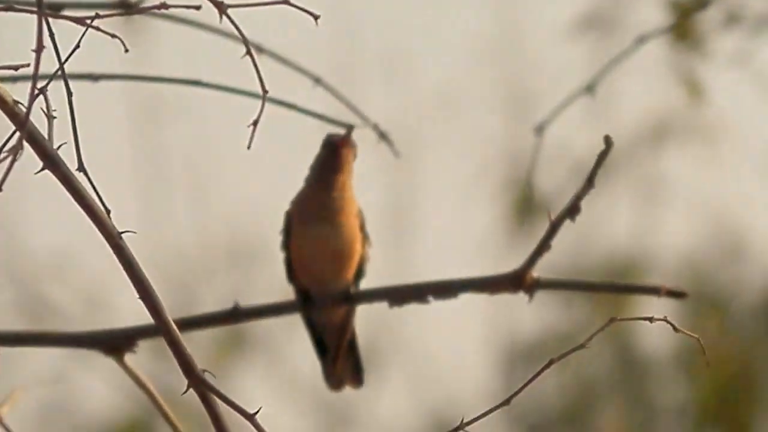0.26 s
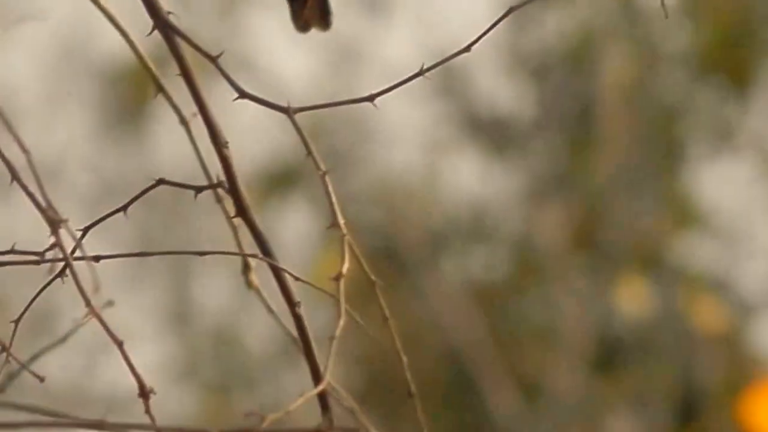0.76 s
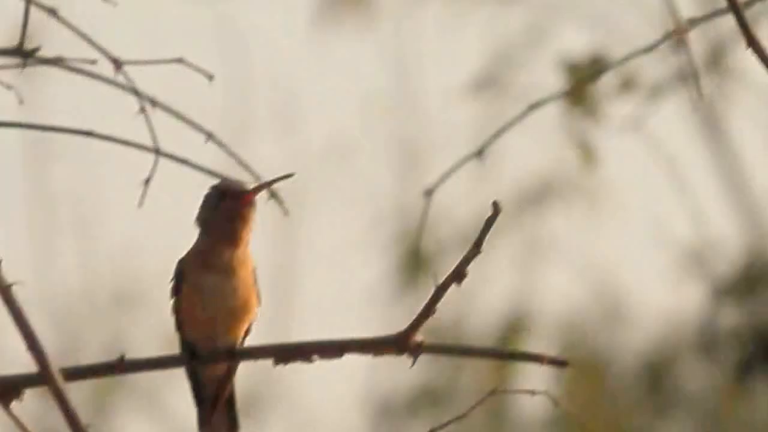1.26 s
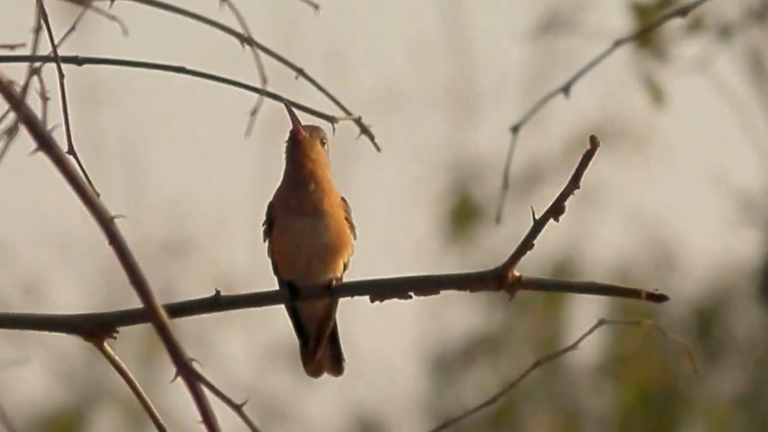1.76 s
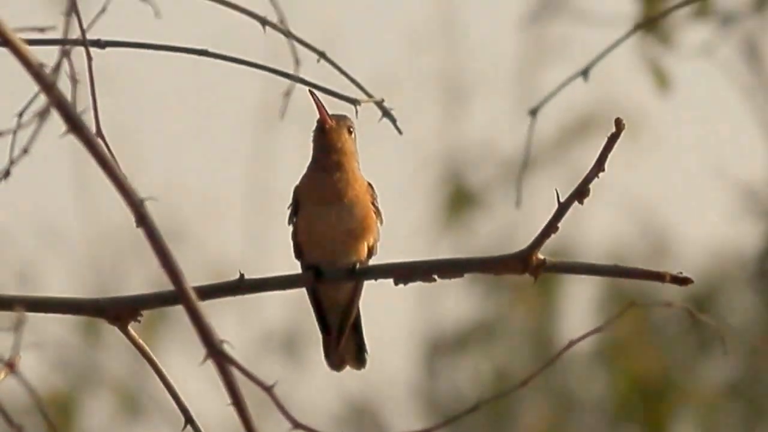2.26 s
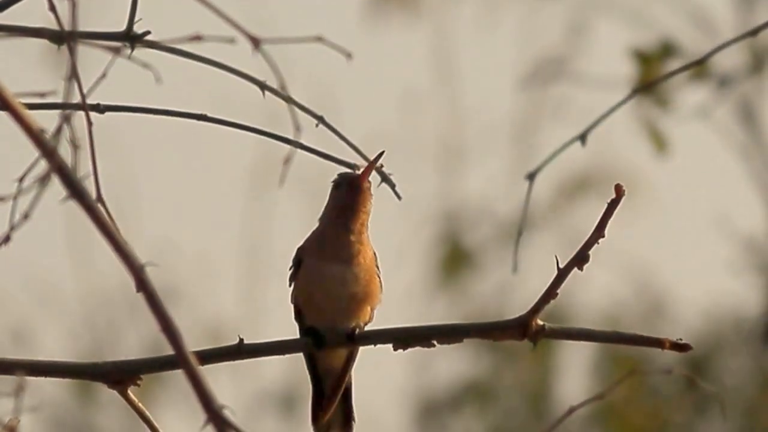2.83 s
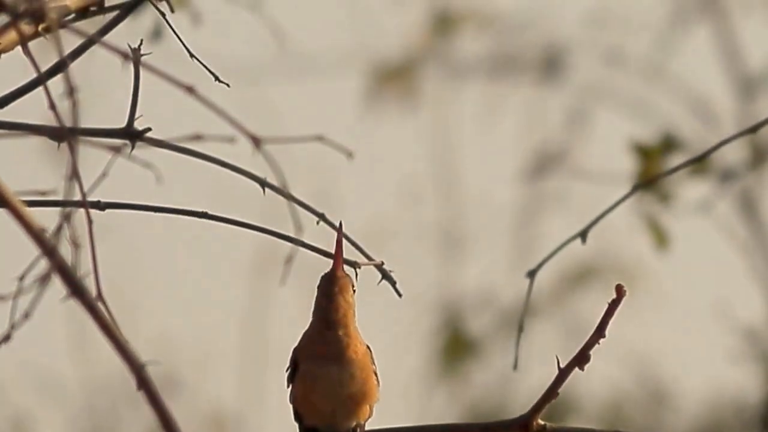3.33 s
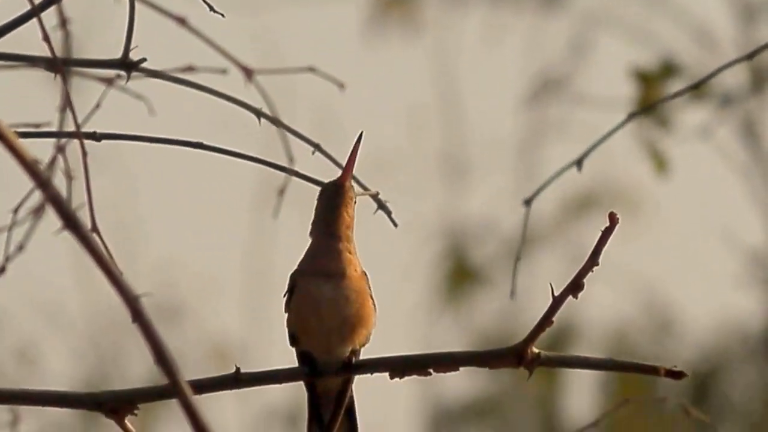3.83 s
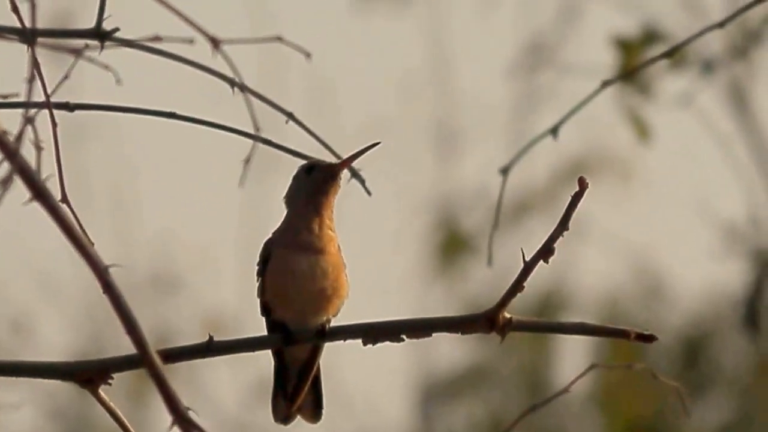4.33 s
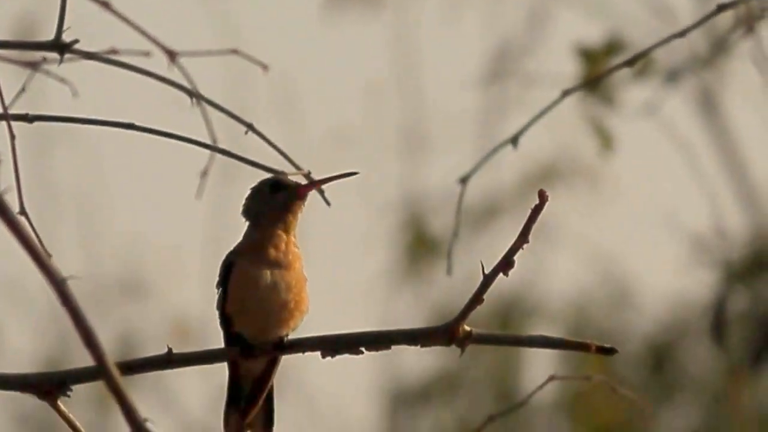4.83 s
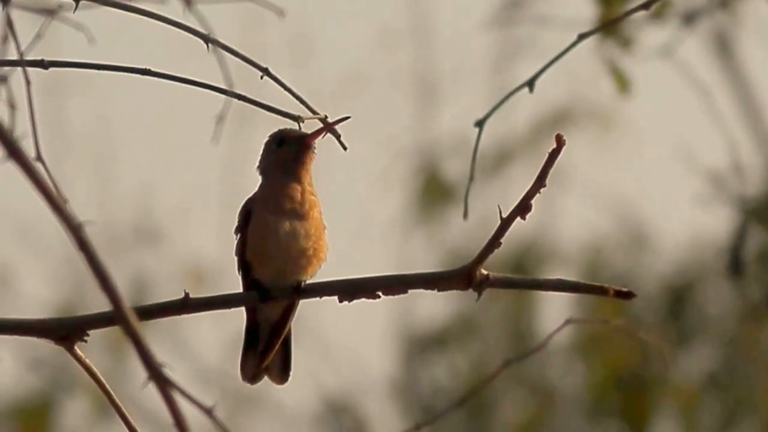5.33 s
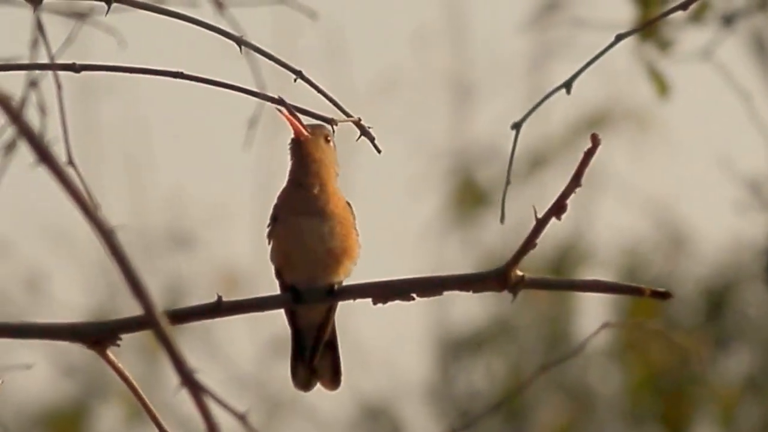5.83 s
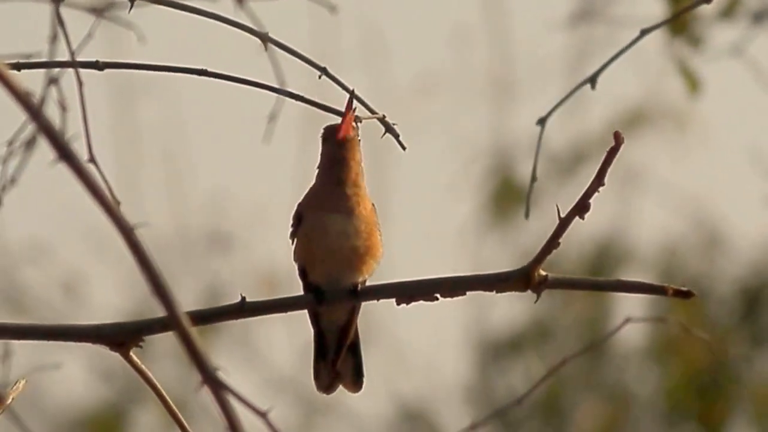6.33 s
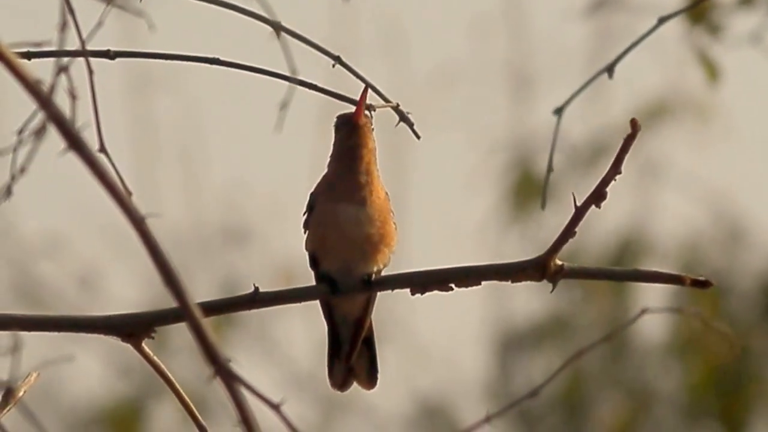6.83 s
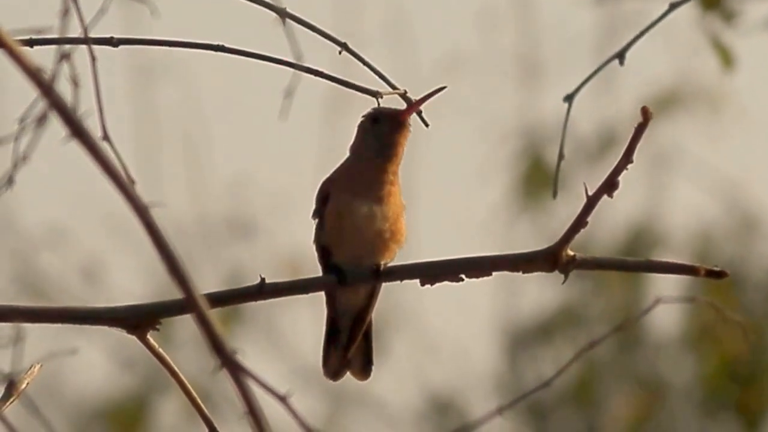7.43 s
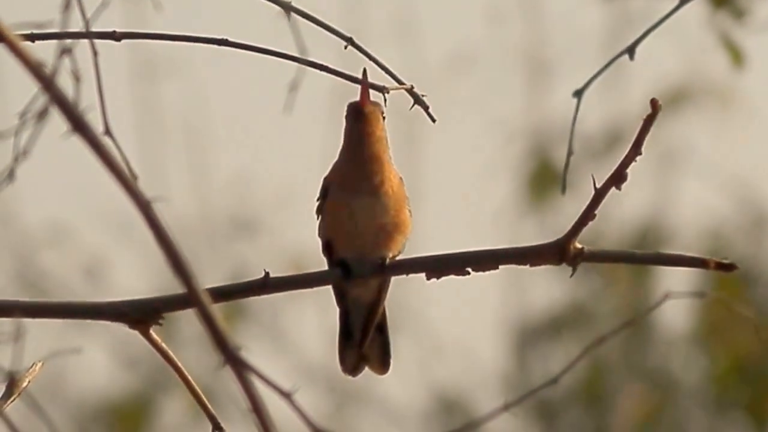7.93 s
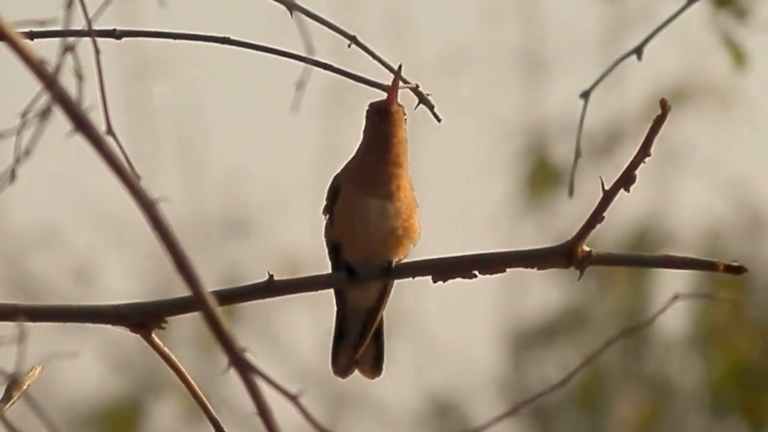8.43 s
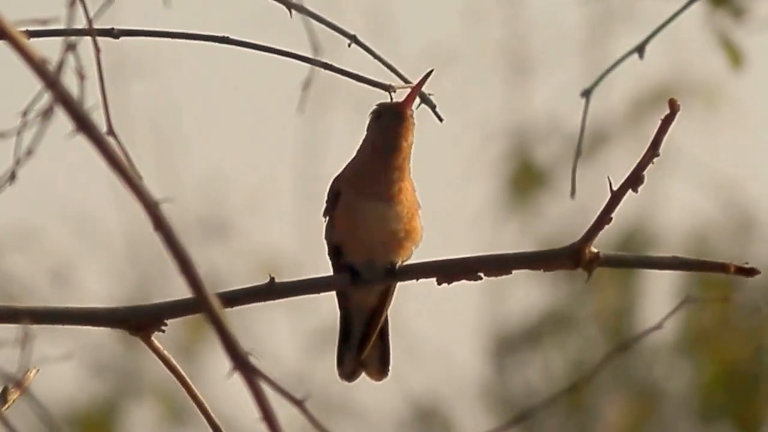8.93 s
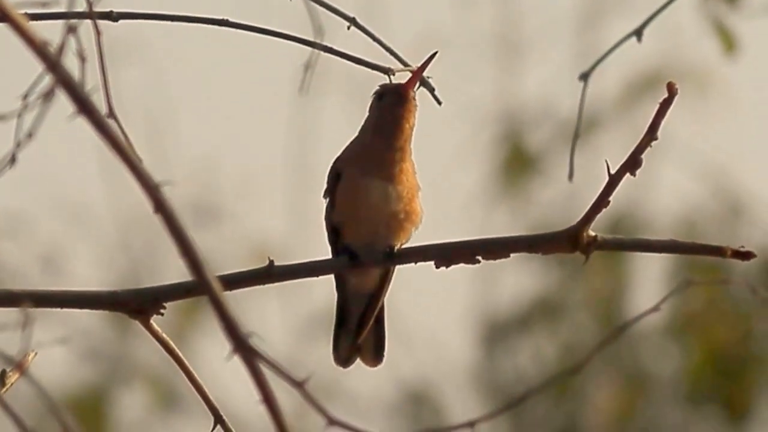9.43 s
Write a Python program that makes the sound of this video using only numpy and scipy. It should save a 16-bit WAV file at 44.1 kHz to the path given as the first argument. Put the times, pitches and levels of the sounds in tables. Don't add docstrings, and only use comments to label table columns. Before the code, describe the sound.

Outdoors in thorny scrub, a hummingbird on a branch gives brief chips, a rough rasp and thin climbing notes, then diving whistles and a run of four hooked notes. Farther birds sweep upward, whistle and warble with blurred echoes. Fine insect shimmer and faint fly hum sit over soft traffic rumble. Fingers tick and knock on the microphone housing, mostly in the first half.

```python
import sys
import numpy as np
from scipy import signal
from scipy.fft import rfft, irfft, next_fast_len
from scipy.io import wavfile
from scipy.ndimage import uniform_filter1d, map_coordinates

SR = 44100
rng = np.random.default_rng(int(sys.argv[2]) if len(sys.argv) > 2 else 0)


def voltage_ratio(level):
    return 10 ** (np.asarray(level, float) / 20)


def put_to_file(sound):
    columns = np.atleast_2d(sound).T
    safe = np.clip(columns, -1, 1)
    whole_steps = np.round(safe * 32767)
    wavfile.write(sys.argv[1], SR, whole_steps.astype(np.int16))


N = 426447


def unit(x):
    return x / np.sqrt(np.mean(x ** 2) + 1e-20)


def along(points, hz):
    f, v = np.transpose(points)
    return np.interp(np.log(hz + 1), np.log(f + 1), v)


def wobble(rate, size=N):
    i = np.arange(0, size + 8, 8)
    knots = rng.standard_normal(int(size * 2000 / SR) + 4)
    return np.interp(np.arange(size), i, map_coordinates(knots, [i * min(rate, 2000) / SR]))


def filtered(x, response):
    m = next_fast_len(N + SR // 2)
    return irfft(rfft(x, m) * response(np.fft.rfftfreq(m, 1 / SR)), m)[:N]


def rush(spectrum, patchy_db):
    z = signal.stft(rng.standard_normal(N), nperseg=512)[2]
    field = uniform_filter1d(uniform_filter1d(rng.standard_normal(z.shape), 5, 0), 12, 1)
    noise = signal.istft(z * voltage_ratio(patchy_db * unit(field)), nperseg=512)[1][:N]
    return unit(filtered(noise, lambda hz: voltage_ratio(along(spectrum, hz))))


def add(track, s, x):
    part = track[round(s * SR):][:len(x)]
    part += x[:len(part)]


def tone(hz):
    return np.sin(2 * np.pi * np.cumsum(hz) / SR)


def traced(rows, smooth):
    s, *cols = np.transpose(rows)
    t = np.arange(s[0], s[-1], 1 / SR)
    size = max(1, int(smooth * SR))
    return [uniform_filter1d(np.interp(t, s, c), size, mode="nearest") for c in cols]


def edges(size, fade):
    i = np.arange(size) / SR / fade
    return np.sin(np.pi / 2 * np.minimum(1, np.minimum(i, i[::-1]))) ** 2


def copies(calls, shape):
    return [[(s + stretch * t, hz * share, db + rel_db) for t, share, rel_db in shape]
            for s, stretch, hz, db in calls]


def scrub(x, t60, gap):
    t = np.arange(SR // 2) / SR
    tail = rng.standard_normal(len(t)) * voltage_ratio(-60 * t / t60) * (t > gap)
    return signal.fftconvolve(x, tail / np.linalg.norm(tail))[:N]


def traffic():
    # time_s, rumble_db, roar_db
    levels = [(0.0, -35.5, -41.5), (2.29, -39, -43), (7.11, -38.5, -42.5), (7.78, -34.5, -43),
              (8.051, -39.5, -42.5), (9.67, -38, -43.5)]
    # pitch_hz, level_db per Hz
    rumble = [(20, -12.5), (45, -9), (75, 4), (100, -5), (135, -0.5), (170, -6), (230, -18.5), (330, -39.5),
              (600, -67)]
    roar = [(120, -40), (220, 2), (350, -3), (520, -4), (660, -3), (900, -5), (1150, -7), (1400, -11.5),
            (2500, -12.5), (3400, -17.5), (4200, -23), (6000, -22.5), (16000, -44)]
    s, rumble_db, roar_db = np.transpose(levels)
    t = np.arange(N) / SR
    low = voltage_ratio(np.interp(t, s, rumble_db) + 3.5) * rush(rumble, patchy_db=-0.5)
    return low + voltage_ratio(np.interp(t, s, roar_db)) * rush(roar, patchy_db=1.08)


def insects():
    # pitch_hz, level_db per Hz
    shimmer = [(5500, -41), (6600, -9.5), (7300, -0.5), (8400, 1), (9000, 5.5), (9700, -3), (11000, -11.5),
               (13000, -15), (15000, -12.5), (15800, -16)]
    # pitch_hz, strokes_per_s, level_db
    singers = [(6982, 40, -70), (7407, 38, -65), (8274, 54, -68), (8646, 54, -67), (8764, 36, -67),
               (8866, 36, -63), (9222, 42, -68), (9494, 49, -69)]
    # time_s, wing_hz
    fly = [(0, 645), (.7, 661), (1.1, 625), (1.8, 656), (2.5, 630), (3.3, 649), (3.7, 672), (4.05, 638),
           (4.25, 689), (4.47, 627), (4.7, 668), (5.3, 645), (6.1, 642), (6.55, 675), (6.95, 645),
           (7.3, 661), (8.2, 640.5), (9.67, 655)]
    # wing_hz, level_db
    wings = [(640, -62), (580, -61), (695, -62), (728, -61)]
    t = np.arange(N) / SR
    out = voltage_ratio(-49.5) * rush(shimmer, patchy_db=0.8)
    for hz, rate, db in singers:
        strokes = np.exp(1.1 * np.cos(2 * np.pi * rate * t + .3 * wobble(4)))
        carrier = np.sin(2 * np.pi * hz * t + 0.4 * wobble(8.9))
        out += voltage_ratio(db + 4.6 * wobble(3.18)) * unit(strokes * carrier)
    fly_hz = np.interp(t, *np.transpose(fly)) * (1 + .008 * wobble(6))
    out += voltage_ratio(-53 + 2.5 * wobble(3)) * tone(fly_hz)
    for hz, db in wings:
        wing_hz = hz * (1 + .015 * wobble(1.2) + .016 * wobble(5))
        out += voltage_ratio(db + 4.5 * wobble(1.6)) * tone(wing_hz)
    return out


def syrinx(hz, db, tilt_db, narrow=1, bigger=1, count=7):
    # pitch_hz, gain_db
    throat = [(1700, -16), (2600, -8), (3500, -10.5), (5000, 9), (6500, 7), (7400, -9.5), (8500, -6),
              (11000, -11.5), (13500, -39), (15500, -45)]
    k = np.arange(1, count + 1)[:, None]
    gain = voltage_ratio(narrow * along(throat, bigger * k * hz) + tilt_db * np.log2(k)) * (k * hz < 16000)
    tones = gain * np.sin(k * 2 * np.pi * np.cumsum(hz) / SR)
    return voltage_ratio(db) * tones.sum(0) / np.sqrt((gain ** 2).sum(0) / 2 + 1e-9)


def chip(db, length, knee_hz, slow):
    rest_hz = 1210
    t = np.arange(round(length * SR)) / SR
    hz = rest_hz + (knee_hz - rest_hz) * np.exp(-t / slow) + (7600 - knee_hz) * np.exp(-t / 0.00072)
    hz = hz * (1 + 0.094 * t / length * wobble(970, len(t)))
    soft_start_db = -6 * np.exp(-t / .002)
    level = db + soft_start_db - 14 * (t / length) ** 2 + 2.0 * wobble(440, len(t))
    return syrinx(hz, level, -4.0, narrow=0.98, count=6) * edges(len(t), 0.00025)


def chips_and_snaps(out):
    # start_s, level_db, length_s, knee_hz, slow_fall_s
    chips = [(.001, -31, 0.022, 3500, 0.0087), (1.809, -29, 0.021, 3890, 0.0092),
             (2.6885, -35.5, 0.023, 3500, 0.018), (3.36, -31, 0.019, 3100, 0.016),
             (3.562, -29, 0.025, 3200, 0.008), (3.768, -26.5, 0.026, 3300, 0.0065)]
    # start_s, level_db
    snaps = [(7.484, -49), (7.529, -43), (8.161, -53), (8.38, -49), (8.466, -48), (8.821, -52), (6.13, -34),
             (6.556, -47), (6.86, -51), (6.974, -50), (2.372, -50)]
    for s, *shape in chips:
        add(out, s, chip(*shape))
    for s, db in snaps:
        add(out, s, chip(db, .004, 3500, .01))


def clear_notes(out):
    # time_s, pitch_hz, level_db
    opener = [(0.05, 3290, -45), (0.06, 3090, -38), (0.066, 3060, -26.5), (0.075, 3060, -22),
              (0.088, 2870, -23.5), (0.097, 2390, -35), (0.108, 2040, -37)]
    # time_s, pitch_hz, level_db
    climbs = [
        [(1.268, 3460, -43), (1.276, 3730, -34.5), (1.292, 3890, -31), (1.314, 4100, -39), (1.324, 4440, -31),
         (1.346, 4630, -36), (1.356, 5500, -27), (1.371, 6500, -23.5), (1.388, 6470, -37)],
        [(5.495, 3910, -31), (5.509, 4200, -29), (5.563, 4520, -31), (5.575, 5200, -23.5), (5.586, 6590, -20),
         (5.595, 5970, -25), (5.605, 5950, -38)],
    ]
    # time_s, pitch_hz, level_db
    flicks = [
        [(3.206, 5900, -38), (3.209, 6080, -33), (3.213, 5930, -28), (3.2155, 3200, -28), (3.218, 1920, -29),
         (3.222, 1600, -33)],
        [(.769, 6500, -31), (.772, 5740, -32), (.777, 4390, -34)],
        [(.776, 6300, -37), (.779, 5600, -38), (.783, 4800, -40)],
    ]
    # start_s, stretch, level_db
    dives = [(4.096, 1.16, -25.5), (4.783, 1.1, -26), (5.1855, .96, -28.5)]
    # after_start_s, pitch_hz, level_db
    dive_shape = [(0, 7260, -8), (.0012, 5890, 4), (.0026, 3860, -6.5), (.008, 2797, 3),
                  (0.013, 2050, -4.5), (0.02, 1950, -5.5), (0.031, 1884, -5.5), (.042, 1770, -7),
                  (.049, 1540, -14), (.054, 1250, -16)]
    diving = copies([(s, stretch, 1, db) for s, stretch, db in dives], dive_shape)
    for note in [opener, *climbs, *flicks, *diving]:
        hz, db = traced(note, 0.0016)
        hz = hz * (1 + .004 * wobble(300, len(hz)) + .01 * wobble(70, len(hz)))
        voice = syrinx(hz, db + .8 * wobble(150, len(hz)), -4.2)
        add(out, note[0][0], voice * edges(len(hz), .002))


def trill(size, rate_hz, scatter):
    return tone(rate_hz * (1 + scatter * wobble(58.6, size)))


def rasp(hz, db, depth, narrow):
    flutter = trill(len(hz), 430, .2)
    chopped = 1 + np.minimum(.45, 3 * depth) * flutter
    hz = hz * (1 + depth * (.45 * flutter + .7 * np.tanh(wobble(1900, len(hz)))))
    voice = syrinx(hz, db + 3 * wobble(1200, len(hz)), -2.5, narrow=narrow)
    return chopped * voice * edges(len(hz), .002)


def rasps_and_scolds(out):
    # time_s, pitch_hz, level_db
    rasps = [
        [(.4955, 4600, -40), (.499, 3580, -34), (.503, 3200, -20.5), (.512, 2620, -22), (.52, 2750, -27),
         (.53, 3200, -29), (.545, 3200, -49)],
        [(.555, 2370, -45), (.57, 2230, -33), (.59, 2730, -31), (.612, 2970, -27), (.63, 3150, -29.5),
         (.648, 3230, -42)],
    ]
    rough_from = [0, .75]
    # start_s, length_s, pitch_hz, level_db, depth_share
    scolds = [(7.695, .03, 1900, -38, .3), (8.16, .025, 2300, -44, .28)]
    for note, rough in zip(rasps, rough_from):
        hz, db = traced(note, 0.0018)
        growth = np.minimum(1, rough + np.arange(len(hz)) / SR / 0.017) ** 2
        add(out, note[0][0], rasp(hz, db, 0.14 * growth, narrow=1.07))
    for s, length, hz, db, depth in scolds:
        u = np.linspace(0, 1, round(length * SR))
        add(out, s, rasp(hz * (1 - .04 * (u - .5)), db - 10 * u, depth, narrow=0.51))


def hook(fall, turn):
    s, first_hz, held_hz, db = fall
    turn_s, low_hz, turn_db, stretch = turn
    drop, rise = stretch * 0.02, stretch * .029
    spent_db = -18
    t = np.arange(s, turn_s + rise, .001)
    fall_s = 0.003 + 0.0024 * (first_hz - held_hz) / 1000
    held = held_hz + (first_hz - held_hz) * np.exp(-((t - s) / fall_s) ** 1.4)
    down = np.clip((turn_s - t) / drop, 0, 1)
    up = np.clip((t - turn_s) / rise, 0, 1)
    hz = low_hz + (held - low_hz) * np.sin(np.pi / 2 * down) ** 2
    lingering = np.minimum(1, up / 0.92) ** 1.32
    hz = hz + (1.193 - 1) * low_hz * np.sin(np.pi / 2 * lingering) ** 2
    drop_s = turn_s - drop
    accent_db = 6 * np.exp((s - t) / 0.0029)
    first = db + accent_db + spent_db * ((t - s) / (drop_s - s)) ** 6
    push_s = [drop_s, drop_s + 0.012, turn_s, turn_s + rise]
    second = np.interp(t, push_s, [db + spent_db, turn_db, turn_db, turn_db - 6.5])
    slip = (t[-1] + 0.0074, .9 * hz[-1], second[-1] - 23)
    return [*np.transpose([t, hz, np.where(t < drop_s, first, second)]), slip]


def hooked_notes(out):
    # start_s, first_hz, held_hz, level_db
    falls = [(5.824, 6770, 4205, -23.5), (6.026, 5570, 4020, -28.5), (6.218, 5200, 3925, -25),
             (6.397, 5520, 3706, -29.5)]
    # turn_s, lowest_hz, level_db, stretch
    turns = [(5.894, 2850, -20.5, 0.89), (6.099, 2873, -20.5, 0.95), (6.291, 2660, -22, 1.07),
             (6.472, 2546, -25, 0.94)]
    for note in map(hook, falls, turns):
        hz, db = traced(note, 0.0028)
        quaver = .006 * wobble(250, len(hz)) + .006 * wobble(90, len(hz))
        voice = syrinx(hz * (1 + quaver), db + 1.3 * wobble(199, len(hz)), -3.0)
        add(out, note[0][0], voice * edges(len(hz), 0.0016))


def open_throated_notes(out):
    # time_s, pitch_hz, level_db
    mew = [(7.795, 1500, -54), (7.83, 1750, -46), (7.862, 1940, -44.5), (7.88, 2464, -42), (7.9, 2074, -45),
           (7.93, 1912, -49), (7.975, 1766, -44.5), (8.05, 1740, -54), (8.11, 1700, -55)]
    # time_s, pitch_hz, level_db
    pip = [(8.24, 1800, -51), (8.244, 3240, -37), (8.25, 3400, -38), (8.259, 3320, -41)]
    hz, db = traced(mew, 0.0053)
    hz = hz * (1 + .016 * wobble(70, len(hz)))
    voice = syrinx(hz, db + 3.5 * wobble(60, len(hz)), -2.5, narrow=.3, bigger=1.4)
    add(out, mew[0][0], voice * edges(len(hz), .01))
    hz, db = traced(pip, .001)
    voice = syrinx(hz, db + wobble(300, len(hz)), -3, narrow=.2, count=3)
    add(out, pip[0][0], voice * edges(len(hz), .001))


def hummingbird():
    out = np.zeros(N)
    chips_and_snaps(out)
    clear_notes(out)
    rasps_and_scolds(out)
    hooked_notes(out)
    open_throated_notes(out)
    high = filtered(out, lambda f: 1 / (1 + (4400 / (f + 1)) ** 6))
    return out + voltage_ratio(-10.0) * scrub(high * (.5 + wobble(420)), 0.19, 0.0028)


def twitter():
    # start_s, length_s, first_hz, last_hz, level_db
    rattles = [(2.165, .15, 2750, 2400, -38), (2.375, .04, 2400, 3000, -43), (6.67, .12, 3000, 2800, -45),
               (7.49, .06, 3000, 2650, -42), (7.715, .09, 3000, 2900, -43)]
    # from_s, to_s
    flock = (8.27, 8.95)
    pulses_per_s, peeps = 66, 340
    out = np.zeros(N)
    for s, length, first_hz, last_hz, db in rattles:
        t = np.arange(round(length * SR)) / SR
        beat = np.sin(np.pi * pulses_per_s * t) ** 6 * np.sin(np.pi * t / length) ** .5
        hz = np.linspace(first_hz, last_hz, len(t)) * (1 - 0.13 * np.sin(2 * np.pi * pulses_per_s * t))
        add(out, s, voltage_ratio(db + 3 * wobble(50, len(t))) * beat * tone(hz))
    for when, pitch, slide, size, life, near in rng.random((peeps, 6)):
        u = np.linspace(0, 1, round((.006 + .03 * life ** 2) * SR))
        hz = 2200 * 2.5 ** pitch * (1 + .25 * (slide - .5) * u)
        in_flock = near < .4
        s = flock[0] + when * (flock[1] - flock[0]) if in_flock else when * N / SR
        add(out, s, voltage_ratio(-63 + 8 * size + 2 * in_flock) * np.sin(np.pi * u) * tone(hz))
    return out + voltage_ratio(-5) * scrub(out, .4, .006)


def neighbour():
    # start_s, length_s, start_hz, top_hz, level_db
    sweeps = [(0.334, 0.085, 4620, 6290, -43), (0.483, 0.016, 4680, 5730, -39),
              (1.373, 0.082, 4800, 5920, -41.5), (1.516, 0.03, 4750, 6250, -42.5),
              (1.545, 0.029, 5200, 6200, -48), (1.578, 0.029, 4890, 6840, -39.5),
              (1.641, .03, 5500, 6720, -52), (2.202, 0.076, 4500, 6050, -42.5),
              (2.301, .035, 5200, 6120, -52), (2.382, 0.023, 4500, 5950, -44.5),
              (2.44, 0.028, 5000, 5950, -55), (2.495, .04, 5200, 6070, -57),
              (2.629, 0.025, 4500, 5950, -56), (2.817, 0.03, 5000, 5900, -60),
              (3.194, 0.07, 4720, 5780, -44), (3.384, .026, 4700, 5720, -46), (0.425, .03, 5300, 6300, -47)]
    hold = .25
    out = np.zeros(N)
    for s, length, start_hz, top_hz, db in sweeps:
        v = np.arange(round((1 + hold) * length * SR)) / SR / length
        u = np.minimum(1, v)
        hz = start_hz + (top_hz - start_hz) * u ** (.9 - 4.6 * length)
        phase = 2 * np.pi * np.cumsum(hz) / SR
        level_db = db + 1.5 + 5.3 * u - 42 * (v - u) + 3.2 * wobble(174, len(u))
        voice = np.sin(phase) + voltage_ratio(-18.5) * np.sin(2 * phase)
        add(out, s, voltage_ratio(level_db) * edges(len(u), 0.0036) * voice)
    out = filtered(out, lambda f: 1 / (1 + (f / 12000) ** 24))
    return out + voltage_ratio(4.5) * scrub(out * (1 + .5 * wobble(150)), 0.42, 0.0017)


def ticks():
    # start_s, knock_db, click_db above the knock
    taps = [(0.387, -22.5, -4), (0.489, -27, -4), (0.57, -27, -12), (1.259, -25.5, -8), (1.47, -26, -7.5),
            (1.604, -27, -9), (2.06, -50, 12), (2.759, -29.5, -7), (2.988, -30, -10), (3.299, -27, -10),
            (3.384, -34, 2), (3.962, -34.5, 1), (4.0007, -38, 2), (4.026, -47, 6), (2.372, -52, 10),
            (2.408, -52, 8), (4.709, -28.5, -11), (5.243, -29.5, -11), (5.258, -33.5, 3)]
    # pitch_hz, width_hz, level_db
    shell = [(2050, 2200, 4), (3200, 1000, 4.5), (6400, 1500, -37)]
    # start_s, pitch_hz, level_db
    pop = (4.0253, 2750, -16.5)
    clicks, knocks, t = np.zeros(N), np.zeros(N), np.arange(SR // 20) / SR
    for s, db, click_db in taps:
        add(clicks, s, voltage_ratio(db + click_db + 7.0 - 60 * t / 0.014) * rng.standard_normal(len(t)))
        add(knocks, s, voltage_ratio(db + 2.0 - 60 * t / 0.028) * np.sin(2 * np.pi * 410 * t))
    s, hz, db = pop
    bump = np.exp(-((t - .002) * hz) ** 2)
    add(knocks, s - .002, voltage_ratio(db) * bump * np.sin(2 * np.pi * hz * (.002 - t)))

    def through_shell(f):
        modes = sum(voltage_ratio(db) * 1j * f * w / (c * c - f * f + 1j * f * w) for c, w, db in shell)
        return modes / (1 + 1j * f / 7000) ** 3

    return knocks + filtered(clicks, through_shell)


def far_birds():
    # start_s, length_s, first_hz, last_hz, level_db
    slides = [(5.84, .14, 5640, 4580, -43), (2.136, .018, 7440, 5600, -42), (4.245, .08, 4400, 3950, -53),
              (7.34, .07, 6400, 5500, -52), (7.513, .014, 8790, 10120, -36), (7.592, .04, 4550, 3500, -48),
              (8.265, .03, 2300, 2900, -42), (8.487, .04, 4350, 3600, -49), (7.68, .03, 4300, 3700, -49)]
    seeps = [(9.165, .015, 9000, 10900, -42), (4.545, .015, 8750, 10700, -43), (2.5, .02, 9900, 11000, -47),
             (5.795, .025, 6320, 6150, -41), (7.562, .036, 3750, 3900, -48), (8.3, .055, 6700, 6750, -53),
             (2.0, .03, 5100, 5300, -49), (8.42, .022, 3100, 3550, -49), (8.43, .024, 4500, 4700, -50),
             (8.507, .02, 4200, 4300, -49), (8.617, .018, 4200, 4400, -49), (8.545, .075, 2250, 2450, -49),
             (8.85, .014, 3450, 3800, -48), (8.93, .024, 3300, 3700, -50), (8.295, .018, 2100, 2250, -47),
             (7.53, .02, 4000, 4700, -52)]
    # start_s, stretch, pitch_hz, level_db
    steps = [(.69, 1, 2960, -53.5), (7.135, 1.03, 2950, -51.5)]
    helds = [(3.39, 1.04, 4030, -46.5), (8.94, 1, 3960, -45.5)]
    arches = [(3.985, 0.99, 4530, -45)]
    # after_start_s, pitch_share, level_db
    step_shape = [(0, 1, 2), (.062, 0.99, 7.5), (.107, .77, 0.5), (.162, .87, 3)]
    held_shape = [(0, .9, -12), (.015, .955, -7), (.066, .985, -2), (.24, 1, 0), (.32, .975, -4),
                  (.35, .985, -15), (.55, .99, -20)]
    arch_shape = [(0, .9, -10), (.015, 0.97, -6), (0.054, 1, -3), (.155, .85, 3)]
    # time_s, pitch_hz, level_db
    sink = [(3.69, 3740, -51), (3.725, 3350, -55), (3.76, 2840, -52), (3.9, 2654, -57), (4.0, 2690, -50)]
    squeak = [(2.045, 4900, -15), (2.05, 7300, -38), (2.058, 8200, -34), (2.09, 8350, -58)]
    swoop = [(.868, 6260, -46), (.886, 6230, -40.5), (.9, 5960, -43.5), (.948, 5280, -38.5),
             (.962, 5190, -53), (1.01, 4850, -56), (1.07, 4400, -58)]
    notes = [sink, squeak, swoop]
    notes += copies(steps, step_shape) + copies(helds, held_shape) + copies(arches, arch_shape)
    for s, length, first_hz, last_hz, db in slides:
        notes.append([(s + u * length, first_hz + (last_hz - first_hz) * u ** .75, db - 25 * u * u)
                      for u in np.linspace(0, 1, num=6)])
    for s, length, first_hz, last_hz, db in seeps:
        notes.append([(s, first_hz, db - 8), (s + length, last_hz, db)])
    out = np.zeros(N)
    for note in notes:
        hz, db = traced(note, 0.0035)
        hz = hz * (1 + .002 * wobble(60, len(hz)))
        level = voltage_ratio(db + 3 + 2.3 * wobble(60, len(hz)))
        add(out, note[0][0], level * tone(hz) * edges(len(hz), .006))
    return out + voltage_ratio(-8.5) * scrub(out, 0.45, 0.0071)


def warbler():
    # start_s, length_s, first_hz, middle_hz, last_hz
    leader = [(4.011, .21, 3020, 3150, 3200), (4.26, .2, 2760, 2870, 2760), (4.478, .06, 3830, 3350, 2900),
              (4.46, .16, 3000, 3270, 3370), (4.96, .2, 2790, 3300, 2750), (5.14, .05, 2850, 3100, 3550),
              (5.5, .17, 3200, 3380, 3400), (5.69, .21, 2900, 3300, 2750), (6.04, .18, 3200, 2970, 2880),
              (6.37, .16, 3160, 2900, 2844)]
    answer = [(4.22, 0.21, 3200, 3200, 3140), (4.29, 0.1, 3470, 3510, 3440),
              (4.551, 0.26, 2760, 2700, 2620), (4.64, 0.119, 3900, 3520, 3300),
              (4.633, 0.24, 3250, 3300, 2880), (5.112, 0.043, 2280, 2200, 2070),
              (5.329, 0.25, 3070, 3430, 2700), (5.398, 0.11, 3050, 2900, 2720),
              (5.016, .16, 3530, 3580, 3500), (5.704, 0.17, 3300, 3200, 3200),
              (4.795, .1, 3050, 3100, 2660)]
    # time_s, level_db
    effort = [(4.01, -43.5), (4.2, -40), (4.3, -43), (4.56, -38.5), (4.75, -42.5), (5.05, -38.5),
              (5.16, -43), (5.35, -40), (5.55, -38.5), (5.8, -45), (6.53, -46.5)]
    # time_s, roughness
    hoarse = [(4.0, .05), (4.7, .12), (4.95, .8), (5.7, .8), (6.1, 1.3)]
    out = np.zeros(N)
    for (s, length, *arc), voice_db in [*((row, 0) for row in leader), *((row, -7) for row in answer)]:
        u = np.arange(round(length * SR)) / SR / length
        hz = np.polyval(np.polyfit([0, .5, 1], arc, deg=2), u)
        db = np.interp(s + u * length, *np.transpose(effort)) + voice_db
        rough = np.interp(s, *np.transpose(hoarse))
        purr = trill(len(hz), 190, .04 + .08 * rough)
        drift = .003 * wobble(40, len(hz)) + .012 * rough * wobble(150, len(hz))
        voice = tone(hz * (1 + (.015 + .017 * rough) * purr + drift))
        level = voltage_ratio(db + 2 * wobble(30, len(hz))) * (1 + .5 * purr)
        add(out, s, level * voice * edges(len(hz), .012))
    roughness = np.interp(np.arange(N) / SR, *np.transpose(hoarse))
    leaves = unit(wobble(520)) * (1.05 + 0.38 * roughness)
    return out + voltage_ratio(-4.5) * scrub(out, 0.56, .006) + voltage_ratio(-4.0) * scrub(out * leaves, .45, .006)


def engines():
    # time_s, firing_hz, level_db
    leaving = [(4.6, 31.6, -41), (4.94, 44.1, -40), (5.09, 47.4, -40), (5.45, 52.9, -33.5),
               (6.52, 62.5, -44), (8.28, 76.6, -36.5), (8.5, 78.1, -52), (8.77, 75.6, -42.5),
               (9.67, 74.5, -30.5)]
    drone = [(4.5, 130.5, -46.5), (7, 132, -38.5), (7.7, 140.3, -40.5), (9.2, 143.9, -43.5)]
    out = np.zeros(N)
    for rows in (leaving, drone):
        hz, db = traced(rows, 0.23)
        level = voltage_ratio(db + 3.0 + 1.6 * wobble(6.0, len(hz)))
        add(out, rows[0][0], level * tone(hz) * edges(len(hz), 0.081))
    return out


def scene():
    birds = hummingbird() + twitter() + neighbour() + far_birds() + warbler()
    return (traffic() + insects() + birds + ticks() + engines())[None]


def roll_off(x):
    return signal.sosfilt(signal.butter(12, 16530, fs=SR, output="sos"), x)


def record(dry):
    def notch(f):
        detuning = 7900 ** 2 - f * f
        return ((detuning + 1j * f * 280) / (detuning + 1j * f * 950)) ** 2 * (f < 15980)

    whine = voltage_ratio(-71) * np.sin(2 * np.pi * 15734 * np.arange(N) / SR)
    mix = filtered(dry[0], notch) + whine
    return roll_off(mix[None])


dry = scene()
out = record(dry)
put_to_file(out)
```